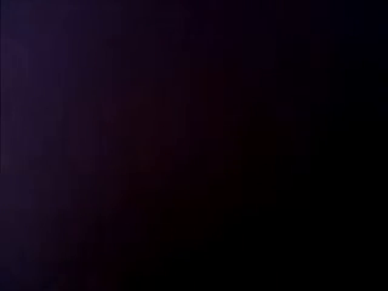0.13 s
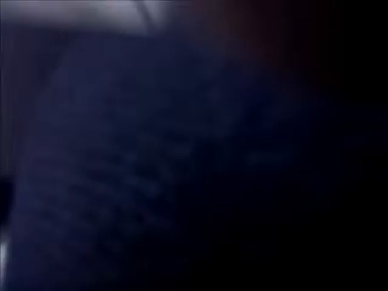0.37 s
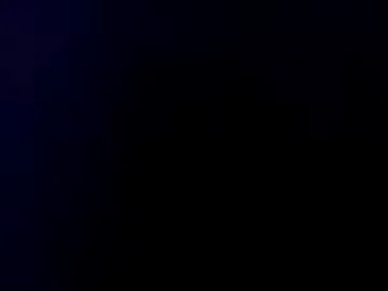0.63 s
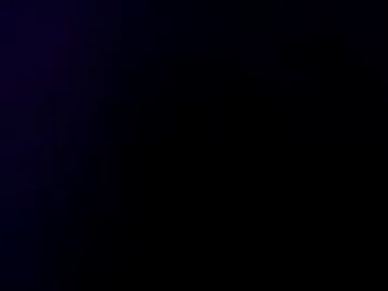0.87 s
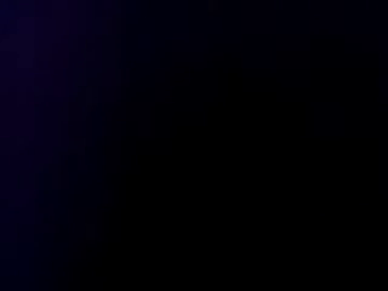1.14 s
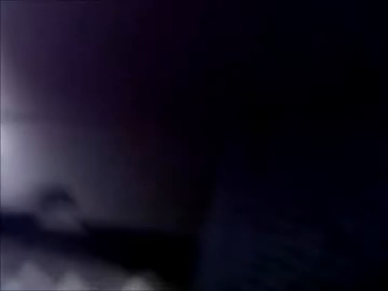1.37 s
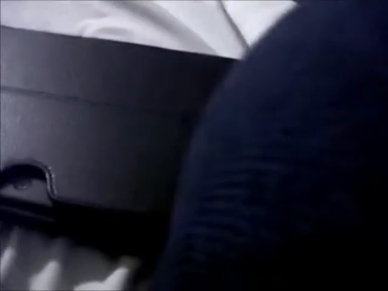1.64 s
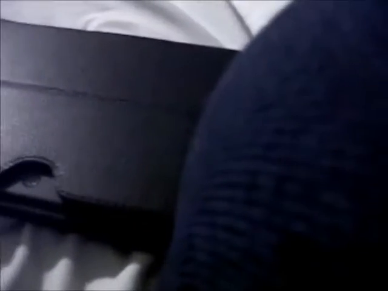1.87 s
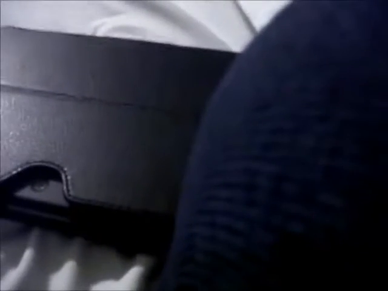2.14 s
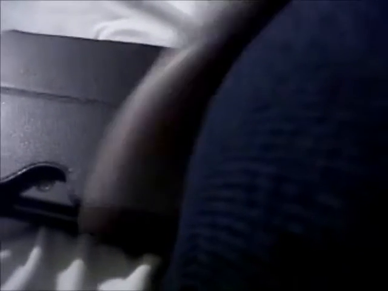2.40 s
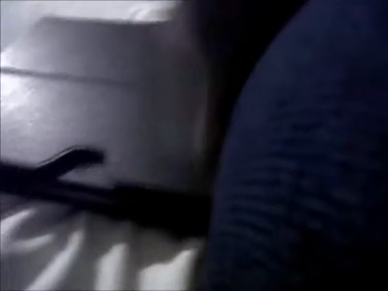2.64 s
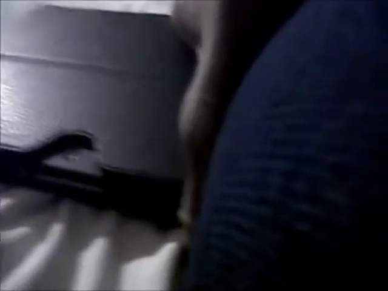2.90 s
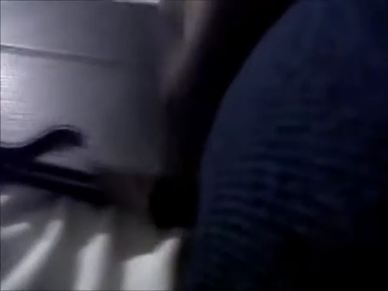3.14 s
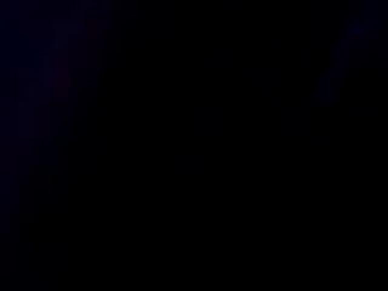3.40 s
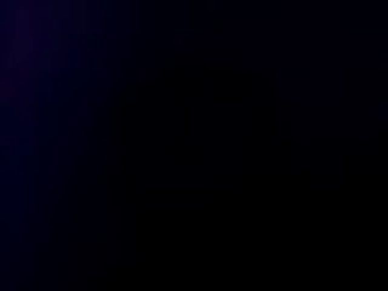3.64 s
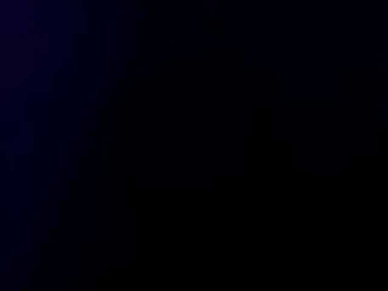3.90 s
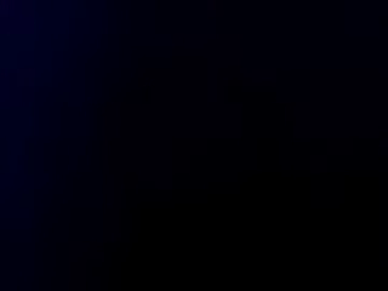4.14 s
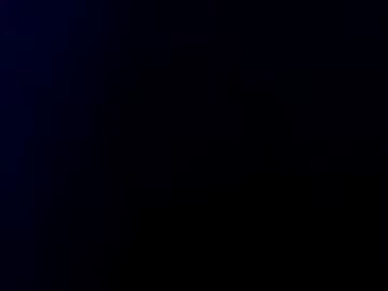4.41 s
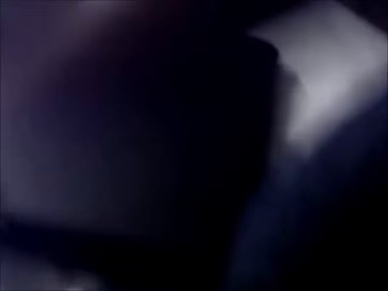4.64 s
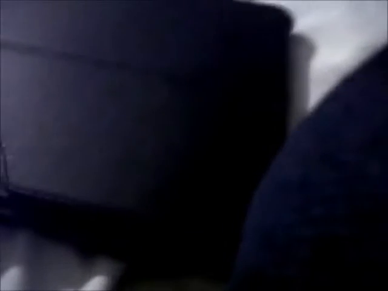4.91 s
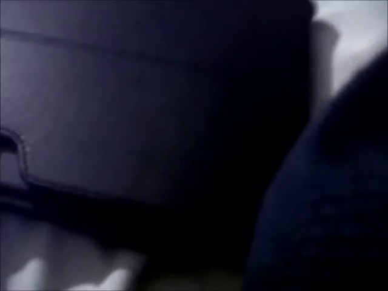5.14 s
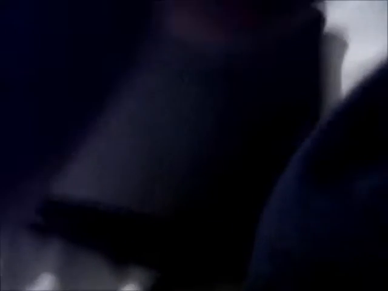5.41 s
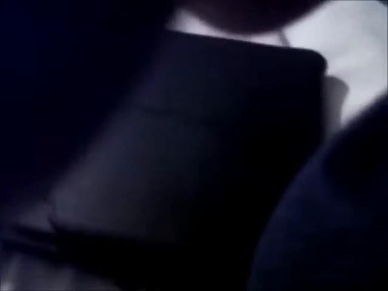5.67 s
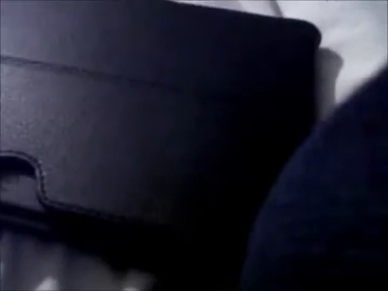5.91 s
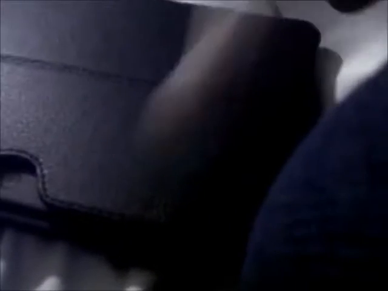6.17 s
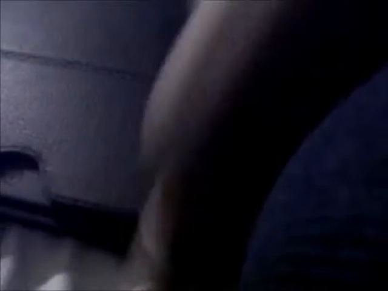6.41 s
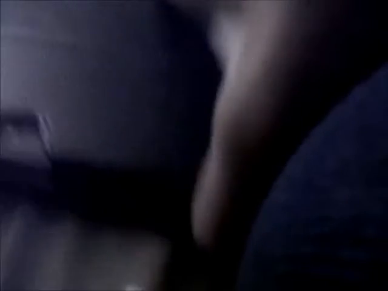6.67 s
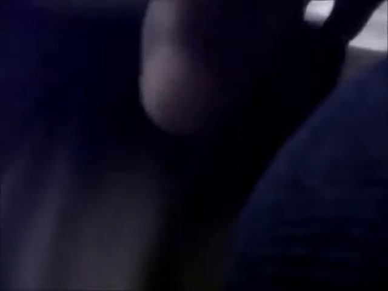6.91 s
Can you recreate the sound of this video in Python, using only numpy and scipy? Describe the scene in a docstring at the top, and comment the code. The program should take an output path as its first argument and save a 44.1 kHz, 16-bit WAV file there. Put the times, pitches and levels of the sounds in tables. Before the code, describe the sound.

A phone microphone is dragged over bedding in a quiet, dry room, very close and dull at the top. From 0 s grainy fabric hiss and scraping come in uneven strokes, with a hard snap near 0.25 s and low bumps. The rubbing swells around 1.25-1.45 s with sharp cracks and a heavy thump, then falls away; a last snap ticks at about 1.75 s. From 2 to 3.4 s there is only faint room hiss, soft cloth brushing and tiny ticks. At 3.5 s contact returns, with a dense cluster of loud crackles and thumps at 3.6-3.7 s, then continuous rough rustling, small fold squeaks and snaps until about 5 s. Afterwards it is nearly silent: a small bump at 5.55 s, a low knock at 5.7 s, hollow light brushes on a stiff case until 6.15 s, then very faint rustles and ticks to 7 s.

```python
"""Fine hiss and a scrape are heard first, as a phone is dragged over bedding in a quiet room: fibres slip across
the microphone port, the weave scrapes the shell, and pressed cloth rumbles and pumps the port.
Rubbing is grainy noise in five bands that follow strokes and presses; snaps and low thumps are short noise bursts,
squeaking folds are noise-modulated sliding tones, and brushes of a stiff case are slips through resonances."""
import sys
import numpy as np
from scipy import signal
from scipy.fft import rfft, irfft
from scipy.io import wavfile
from scipy.ndimage import uniform_filter1d

SR = 44100
rng = np.random.default_rng(int(sys.argv[2]) if len(sys.argv) > 2 else 0)


def to_wav(sig):
    """Store sig (one row per channel, or 1-D mono) as 16-bit WAV at the path in sys.argv[1].

    Samples outside -1..1 are clipped; the rate is SR.
    """
    pcm = np.clip(np.atleast_2d(sig), -1, 1) * 32767
    pcm = np.round(pcm).astype(np.int16)
    wavfile.write(sys.argv[1], SR, pcm.T)  # frames by channels


def boost_factor(decibels):
    """Convert a level in decibels to a linear amplitude factor."""
    exponent = np.asarray(decibels, float) / 20
    return 10 ** exponent


N = 310464
HZ = np.arange(N // 2 + 1) * SR / N + 1e-3  # frequency axis, kept off zero for the logarithms
GRID = 16  # samples between the points at which gestures are computed


def unit(x):
    """Normalization: a signal scaled to rms 1."""
    return x / np.sqrt(np.mean(x ** 2))


def shaped(x, gain):
    """Linear filtering: the spectrum of x times a gain over frequency."""
    return irfft(rfft(x) * gain, N)


def walk(rate_hz):
    """Low-pass random process: slow chance with spread 1."""
    return unit(shaped(rng.standard_normal(N), 1 / (1 + (HZ / rate_hz) ** 2)))


def slips(rate_per_s, scatter_db):
    """Stick-slip friction: fibres let go one by one at random moments, a few far harder than the rest."""
    excess = np.minimum(rng.exponential(size=N), 4.5)
    size = boost_factor(scatter_db * excess) * rng.choice([-1, 1], N)
    lets_go = rng.random(N) < rate_per_s / SR
    return unit(size * lets_go)


def swell(s, rise, fall):
    """Gesture envelope: power that peaks at 1 and is 20 dB down one rise before and one fall after."""
    roundness = 1.355  # power of time: 1 pointed, 2 rounded
    t = np.arange(0, N, GRID) / SR - s
    distance = np.where(t < 0, -t / max(rise, .005), t / max(fall, .005))
    return boost_factor(-40 * distance ** roundness)


def per_sample(power):
    """Interpolation of level: dB for every sample from the coarse power of the gestures."""
    return np.interp(np.arange(N), np.arange(0, N, GRID), 10 * np.log10(power + 1e-14))


def contact_levels():
    """Addition of powers: strokes feed the upper four layers by their weight, presses the lower three."""
    # strokes over the cloth: peak t/s, rise t/s, fall t/s, fibre hiss level/dB, weight (scrape against hiss)/dB
    strokes = [(.03, 0.47, 0.21, -34, 1), (.12, 0.15, 0.12, -37.5, -2), (.233, 0.022, 0.017, -28, -8),
               (0.304, 0.13, 0.1, -34, -1), (.42, 0.12, 0.054, -40.5, -11), (.453, 0.024, 0.02, -37, 0.5),
               (.55, 0.3, 0.14, -46.5, -2), (.6, 0.034, .08, -39.5, -2), (.65, 0.085, 0.086, -34.5, -2),
               (.71, 0.12, 0.05, -31, -4.5), (0.841, 0.068, 0.061, -38.5, -6),
               (.89, .08, 0.042, -38.5, -5.5), (.938, 0.017, 0.016, -44, -2),
               (1.061, 0.14, 0.18, -39.5, -0.5), (1.155, 0.11, 0.084, -36.5, -5),
               (1.225, 0.063, 0.12, -40.5, -8), (1.34, 0.095, 0.11, -29, 3), (1.41, .1, .08, -26, 0.5),
               (1.455, 0.086, .04, -30.5, -0.5), (1.58, 0.23, 0.17, -46.5, -2),
               (1.74, 0.095, 0.12, -48, -12), (1.82, 0.24, 0.068, -44, -6), (1.87, .1, 0.93, -54, -10),
               (2.33, 0.17, .07, -59, -10), (2.4, 0.26, 0.015, -58, -6), (2.7, 0.087, 0.064, -64, -4),
               (2.83, 0.21, .2, -55, -9.5), (2.93, 0.29, 0.16, -53.5, -7.5), (3.06, 0.11, .1, -55, -3.5),
               (3.125, 0.12, .02, -59, -13), (3.36, 0.13, 0.29, -64, -5), (3.55, .09, .08, -50, -0.5),
               (3.615, 0.077, .1, -36, -2.5), (3.686, .1, 0.088, -28.5, 1), (3.78, 0.13, 0.13, -37, 1.5),
               (3.876, 0.032, 0.093, -36.5, 4), (3.985, 0.11, .12, -30.5, 3),
               (4.114, 0.081, 0.14, -35, 2.5), (4.2, 0.17, 0.18, -32, -3.5), (4.3, 0.17, 0.2, -28.5, -7),
               (4.44, 0.12, 0.13, -33, -3.5), (4.54, 0.099, 0.11, -31.5, -3.5),
               (4.69, 0.13, 0.13, -31, 2.5), (4.909, 0.086, 0.064, -30, -1.5), (4.82, .05, .04, -56, 8),
               (4.97, 0.12, 0.13, -34.5, -5), (5.13, .2, 0.25, -52, -11), (5.25, .15, 0.02, -61, -17),
               (5.36, 0.062, 0.15, -57, -7.5), (5.45, .1, .09, -63, -8), (5.565, .04, .07, -77, 5),
               (5.75, 0.11, 0.054, -59, -4), (5.825, 0.074, .09, -54.5, -5), (5.93, 0.095, .09, -50, -8),
               (6.118, 0.048, 0.046, -53, -1), (6.155, .04, 0.015, -58.5, -8),
               (6.5, 0.025, 0.37, -63.5, -4), (6.66, 0.18, .25, -60.5, -13), (6.8, 0.13, 0.14, -57, -3.5),
               (6.895, .07, .05, -62, 7), (6.93, .15, .025, -61.5, -1), (7.04, 0.19, .1, -64, 3.5)]
    # bumps and presses on the shell:
    # peak t/s, half length t/s, shell rustle level/dB, cloth rumble level/dB, port pumping level/dB
    presses = [(0.052, 0.15, -46, -46.5, -52.5), (0.111, 0.044, -41.5, -44, -71),
               (0.3, 0.096, -39, -47, -50.5), (0.444, 0.024, -59, -48, -44),
               (0.727, 0.028, -50, -54, -36.5), (0.663, 0.018, -41, -53, -70),
               (0.859, 0.059, -43.5, -53.5, -56), (0.947, 0.061, -61, -70, -51),
               (1.08, 0.039, -45.5, -47.5, -56), (1.33, 0.09, -39, -36, -43.5),
               (1.379, 0.054, -27.5, -30.5, -44), (1.432, 0.029, -31, -32.5, -48),
               (2.865, 0.12, -57.5, -76, -57), (3.04, 0.059, -56.5, -61, -45), (3.097, 0.06, -63, -69, -44),
               (3.168, 0.041, -62, -55, -62), (3.459, 0.023, -51, -63, -62), (3.497, .05, -68, -66, -48),
               (3.55, 0.035, -46, -53, -60), (3.639, 0.072, -37, -41, -47),
               (3.685, 0.038, -31.5, -32.5, -40), (3.755, 0.045, -50, -53, -42.5),
               (3.98, 0.083, -32, -37.5, -47), (4.04, 0.027, -51, -36.5, -47),
               (4.146, 0.12, -43.5, -45, -58.5), (4.452, .06, -49, -44.5, -65),
               (4.548, 0.096, -36.5, -46.5, -69), (4.783, 0.072, -43.5, -60, -72),
               (4.896, .06, -57, -48.5, -47.5), (5.565, 0.034, -45.5, -49, -45.5),
               (5.6, .035, -54, -57, -51), (5.707, 0.019, -51, -50.5, -34), (6.589, 0.035, -62, -64, -48.5),
               (6.645, 0.046, -72, -68, -43.5), (6.68, .035, -68, -70, -54), (6.82, .03, -58, -70, -50),
               (6.86, .035, -63, -70, -48), (6.897, 0.036, -45, -61, -68)]
    # resting contact: hiss, scrape, rustle, rumble, pumping level/dB
    rest_db = (-73.5, -71, -69.5, -69, -68.5)
    # shell rustle of a stroke against its hiss: level at no weight/dB, slope/(dB per dB of weight)
    rustle_law = (-6.5, 1.19)
    # cloth rumble of a stroke against its hiss: level at no weight/dB, slope/(dB per dB of weight)
    rumble_law = (-18.5, 1.25)
    # exponents on a stroke's swell for hiss, scrape, rustle, rumble: lower layers rise and die faster
    steepness = (1.01, 1.156, 1.28, 1.35)
    points = len(np.arange(0, N, GRID))
    power = np.outer(boost_factor(np.array(rest_db)) ** 2, np.ones(points))
    for s, rise, fall, db, weight_db in strokes:
        lower = [db + base_db + slope * weight_db for base_db, slope in (rustle_law, rumble_law)]
        peak_power = boost_factor(np.c_[[db, db + weight_db] + lower]) ** 2
        power[:4] += peak_power * swell(s, rise, fall) ** np.c_[list(steepness)]
    for s, half, *db in presses:
        power[2:] += np.outer(boost_factor(np.array(db)) ** 2, swell(s, half, half))
    return [per_sample(p) for p in power]


def steep(hz):
    """Filter slope: hiss and scrape are parted steeply near 4 kHz; the lower layers blend."""
    return 120 if hz > 3000 else 10


def rubbing():
    """Frictional noise: all layers share the same slips, so grains cut across the spectrum."""
    # hiss, scrape, rustle, rumble, pumping:
    # low edge f/Hz, high edge f/Hz, tilt/(dB per octave), grains' share of power (0-1), flicker/dB
    layers = [(4120, 7530, -5.5, 0.45, 0.9), (1400, 4020, -0.6, 0.23, 1.9), (400, 1290, 0.5, 0.29, 1.56),
              (92, 357, 1.5, 0.17, 2.5), (18, 99, -2.5, 0.3, 4)]
    grains, drag = slips(3000, 2.8), walk(55)
    levels = contact_levels()
    pumping_db = levels[-1]
    # air trapped under the cloth swings to and fro at a wavering rate around 40 Hz
    swing_hz = 40 * boost_factor(2.4 * walk(7.8))
    swing = np.sin(2 * np.pi * np.cumsum(swing_hz) / SR)
    out = 0.75 * boost_factor(pumping_db) * swing
    noise_levels = levels[:-1] + [pumping_db - 5.5]
    for (lo_hz, hi_hz, tilt_db, grainy, flicker_db), db in zip(layers, noise_levels):
        low_cut, high_cut = 1 + (lo_hz / HZ) ** steep(lo_hz), 1 + (HZ / hi_hz) ** steep(hi_hz)
        colour = boost_factor(tilt_db * np.log2(HZ / lo_hz)) / np.sqrt(low_cut * high_cut)
        contact = np.sqrt(grainy) * grains + np.sqrt(1 - grainy) * rng.standard_normal(N)
        # the colour is patchy: lower, middle and upper part of a layer swell on their own
        place = np.clip(2 * np.log(HZ / lo_hz) / np.log(hi_hz / lo_hz), 0, 2)
        band = np.zeros(N)
        for k in range(3):
            part = shaped(contact, colour * np.clip(1 - abs(place - k), 0, 1))
            band += part * boost_factor(flicker_db * walk(8.8))
        out = out + boost_factor(db) * unit(band * boost_factor(0.67 * drag))
    return out


def room():
    """Stationary background noise: still air and the microphone's own hiss."""
    # relative noise spectrum: f/Hz, spectral density level/dB
    spectrum = [(18, -30), (30, 5), (287, -5), (361, -10.5), (791, -12), (7400, -32), (9620, -64.5),
                (16300, -120)]
    total_db = -78.5
    hz, db = np.transpose(spectrum)
    colour = boost_factor(np.interp(np.log(HZ), np.log(hz), db))
    return boost_factor(total_db) * unit(shaped(rng.standard_normal(N), colour))


def snaps_and_thumps():
    """Impulsive release: a kick and a short noisy crackle, in a band given for each event."""
    # snaps, ticks and low thumps: onset t/s, peak level/dB, low edge f/Hz, high edge f/Hz
    burst_table = [(0.058, -15, 1420, 5280), (.0756, -17, 690, 4360), (0.0996, -17.5, 570, 5140),
                   (0.236, -2.5, 1400, 7300), (.435, -33.5, 50, 280), (0.4488, -17.5, 1550, 5890),
                   (0.516, -31.5, 400, 1890), (0.717, -32, 40, 196), (.8495, -16, 5800, 7200),
                   (.872, -41, 40, 250), (0.9347, -24, 1120, 4770), (.99, -25, 1290, 5290),
                   (1.068, -17, 1090, 4590), (1.23, -25, 1340, 2710), (1.263, -2.5, 1820, 6900),
                   (1.3785, -9, 250, 2620), (1.372, -20, 50, 420), (1.432, -23.5, 60, 400),
                   (1.42, -4.5, 880, 4370), (1.5546, -30, 2400, 4690), (1.5887, -25, 950, 4680),
                   (1.6106, -27.5, 2360, 5880), (1.743, -41, 50, 330), (1.756, -11, 1300, 6100),
                   (2.337, -36, 740, 6380), (2.4998, -47, 160, 400), (2.849, -38, 980, 1870),
                   (2.8583, -43, 940, 4530), (2.8959, -33, 4870, 6830), (3.0142, -40, 640, 5310),
                   (3.018, -48, 60, 260), (3.0861, -40, 1350, 5690), (3.1608, -42, 200, 620),
                   (3.3408, -39.5, 1130, 3880), (3.4562, -44, 450, 1500), (3.5307, -33, 870, 5230),
                   (3.5497, -28, 1370, 6400), (3.5911, -13.5, 740, 4980), (3.604, -13, 2810, 5290),
                   (3.632, -13, 2870, 5020), (3.652, -7, 450, 4200), (3.6698, -12, 360, 2440),
                   (3.672, -19.5, 60, 400), (3.682, -13.5, 400, 2600), (3.694, -15, 70.4, 454),
                   (3.6964, -3.5, 1153, 5700), (3.8535, -12.5, 1890, 5500), (3.8676, -15, 3700, 5300),
                   (3.877, -12.5, 700, 5500), (3.978, -12, 450, 3740), (4.0051, -12.5, 570, 4160),
                   (4.3236, -14.5, 2610, 6900), (4.7316, -14.5, 530, 3120), (4.7598, -11.5, 890, 4100),
                   (5.3511, -36, 690, 5360), (5.4055, -38.5, 1200, 2380), (5.55, -34, 300, 1500),
                   (5.563, -37, 500, 1930), (5.5671, -31, 400, 1660), (5.591, -40, 400, 1920),
                   (5.6986, -23.5, 250, 2830), (5.7004, -28.5, 2300, 2880), (5.8485, -30, 1200, 5240),
                   (5.965, -42, 2650, 5760), (6.578, -42, 600, 1000), (6.794, -43, 1040, 5970),
                   (6.8917, -37, 700, 1840), (7.0186, -39, 330, 800), (7.019, -44, 1500, 3480)]
    crackle_t60_s, rise_s = .012, 0.0011
    kick = 5.1  # against the crackle noise of rms 1
    length = 2048
    out, t = np.zeros(N + length), np.arange(length) / SR
    envelope = np.exp(-np.log(1000) * t / crackle_t60_s) * np.minimum(t / rise_s, 1)
    for s, db, lo_hz, hi_hz in burst_table:
        burst = rng.standard_normal(length) * envelope
        burst[0] = -kick
        # cloth lets some body through below the band and muffles sharply above it
        body = signal.butter(2, lo_hz, "highpass", fs=SR, output="sos")
        muffle = signal.butter(4, hi_hz, fs=SR, output="sos")
        crack = signal.sosfilt(np.vstack([body, muffle]), burst)
        i = int(s * SR)
        out[i:i + length] += boost_factor(db) * crack / np.abs(crack).max()
    return out[:N]


def squeaks():
    """Amplitude modulation by noise: a taut fold sings in a narrow band that slides as it stretches."""
    # onset t/s, length t/s, start f/Hz, end f/Hz, width f/Hz, level of the modulator/dB
    squeak_table = [(0.329, 0.051, 2300, 2340, 300, -41), (1.093, 0.12, 1643, 1743, 520, -39),
                    (1.555, 0.037, 1473, 1480, 250, -49), (2.836, 0.05, 1490, 1400, 400, -58),
                    (3.339, 0.045, 1320, 2000, 260, -57.5), (3.596, 0.063, 2750, 2770, 700, -33),
                    (4.299, 0.17, 1583, 1855, 250, -45), (6.878, 0.058, 885, 200, 300, -52)]
    out = np.zeros(N)
    for s, length, start_hz, end_hz, width_hz, db in squeak_table:
        waver = unit(shaped(rng.standard_normal(N), 1 / (1 + (2 * HZ / width_hz) ** 2)))
        progress = np.clip((np.arange(N) / SR - s) / length, 0, 1)
        phase = 2 * np.pi * np.cumsum(start_hz + (end_hz - start_hz) * progress) / SR
        envelope = np.sqrt(2 * np.sin(np.pi * progress) ** 2)
        out += boost_factor(db) * envelope * waver * np.sin(phase)
    return out


def case():
    """Resonance under random excitation: light brushing rings the stiff case."""
    # brushes of the case: peak t/s, rise t/s, fall t/s, level/dB
    brushes = [(5.735, 0.03, 0.051, -54.5), (5.832, 0.077, 0.071, -53.5), (5.932, 0.11, 0.057, -53.5),
               (6.125, 0.039, 0.033, -46.5)]
    # resonances of the case: f/Hz, half-power width f/Hz, relative level/dB
    resonances = [(770, 102, -7), (1200, 100, 6), (1650, 110, -6), (2620, 140, -2)]
    modes = sum(boost_factor(db) / (1 + (1.3 * (HZ - hz) / width) ** 2) for hz, width, db in resonances)
    power = sum(boost_factor(db) ** 2 * swell(s, rise, fall) for s, rise, fall, db in brushes)
    return boost_factor(per_sample(power)) * unit(shaped(slips(4000, 4.3), modes))


def scene():
    """Superposition: all sounds add, without echo; once, the level above the bass dips briefly."""
    # start t/s, end t/s, lower edge f/Hz, gain above it/dB
    dip = (5.65, 5.693, 700, -22)
    start, end, above_hz, db = dip
    dry, t = rubbing() + room() + snaps_and_thumps() + squeaks() + case(), np.arange(N) / SR
    gap = uniform_filter1d(1. * ((t > start) & (t < end)), size=100)
    above_bass = shaped(dry, 1 / (1 + (above_hz / HZ) ** 8))
    return (dry - (1 - boost_factor(db)) * gap * above_bass)[None]


def top_cut(x):
    """Nothing passes above the cut-off."""
    return signal.sosfilt(signal.butter(12, 8080, fs=SR, output="sos"), x)


def record(dry):
    """Band limitation: the phone's voice channel has a narrow dip mid-band and ends steeply at the top."""
    seam_hz, seam_width_hz, top_hz = 3960, 51, 6950
    offset = .0007  # standing offset of the converter
    seam = 1 - 0.91 / (1 + (2 * (HZ - seam_hz) / seam_width_hz) ** 2)
    top = 1 / np.sqrt(1 + (HZ / top_hz) ** 40 + (HZ / 7260) ** 500)
    top = top + boost_factor(-27.5) / (1 + (HZ / 7500) ** 60)  # a faint shelf reaches a little higher
    # fades of 64 samples at both ends
    ends = np.clip(np.minimum(np.arange(N), np.arange(N)[::-1]) / 64, 0, 1)
    mix = shaped(dry * ends, seam * top) + offset * ends
    return top_cut(mix)


dry = scene()
out = record(dry)
to_wav(out)
```